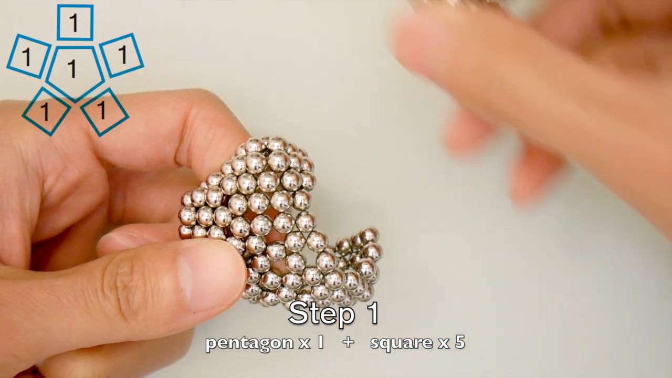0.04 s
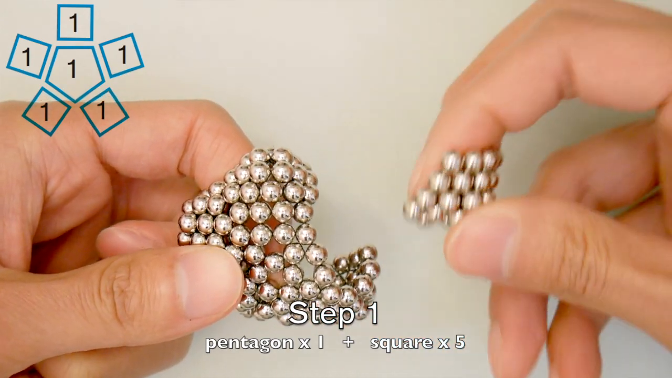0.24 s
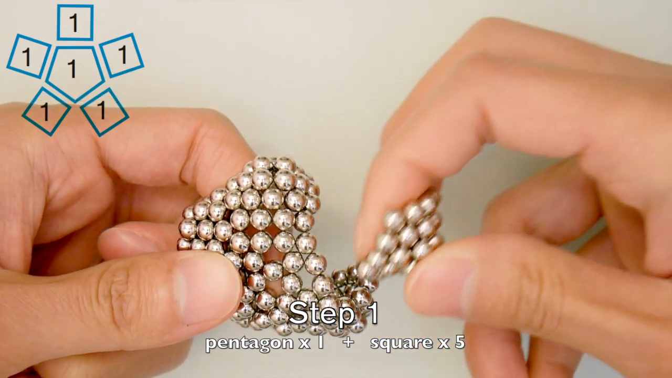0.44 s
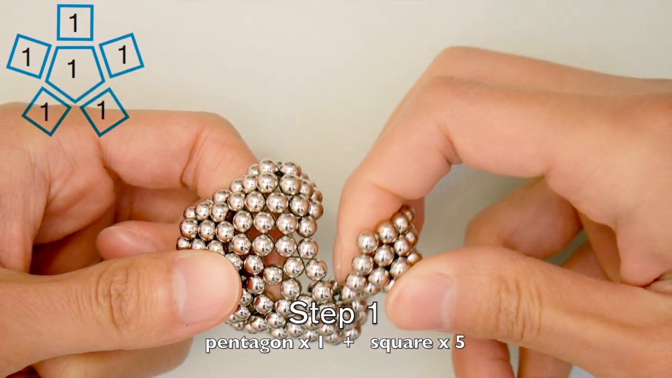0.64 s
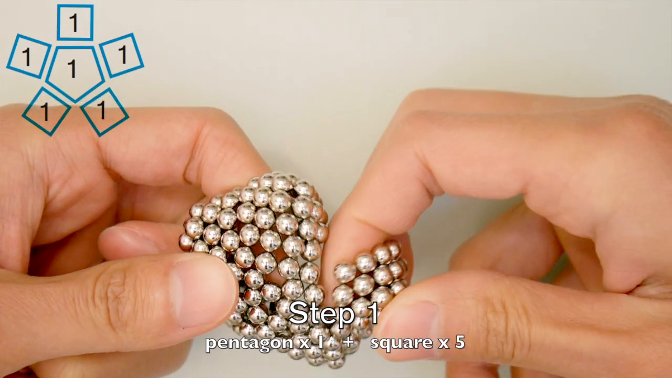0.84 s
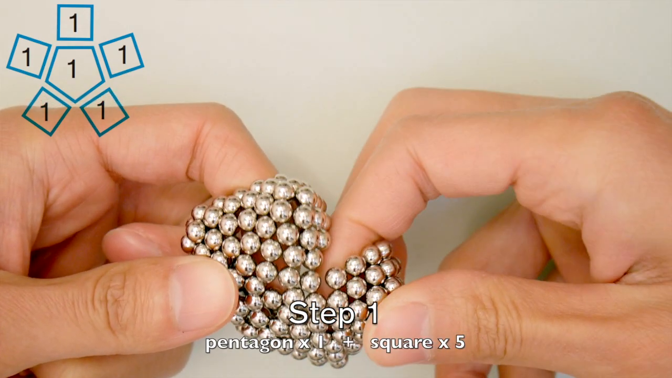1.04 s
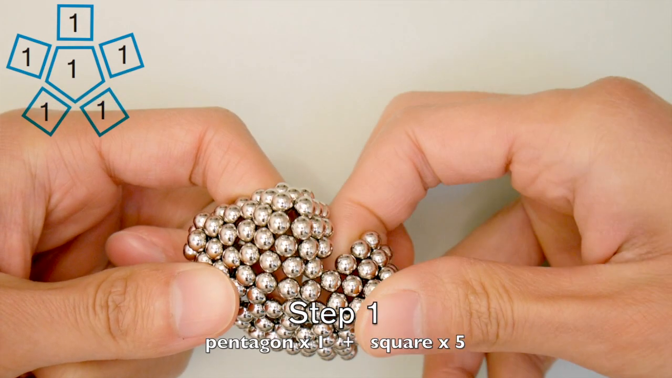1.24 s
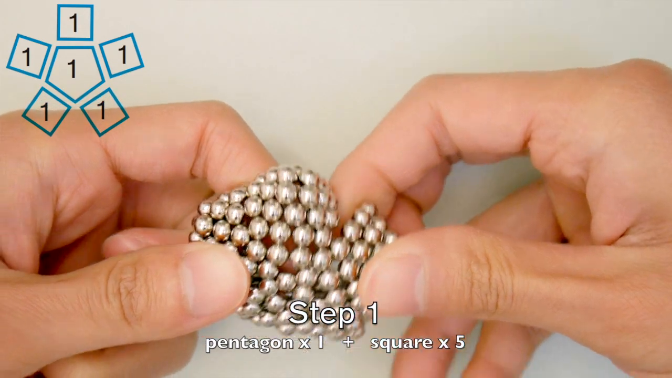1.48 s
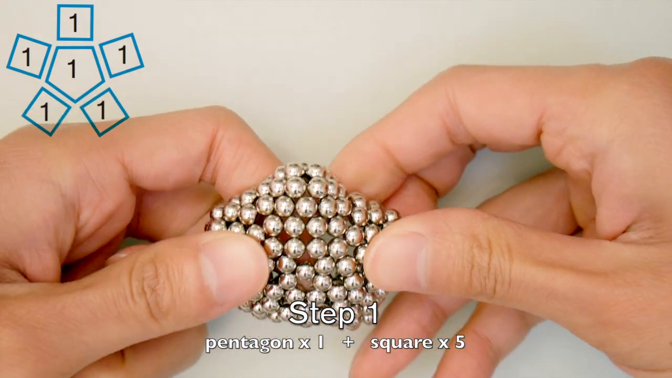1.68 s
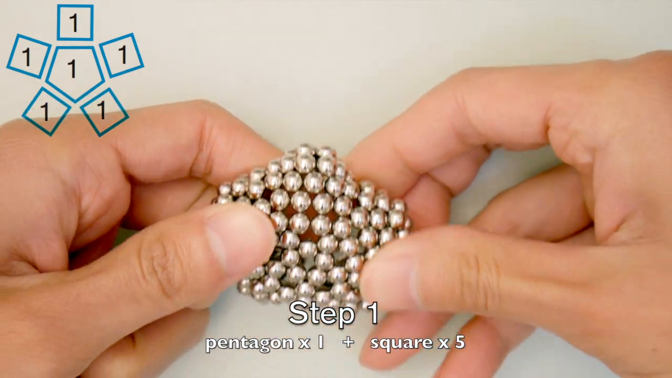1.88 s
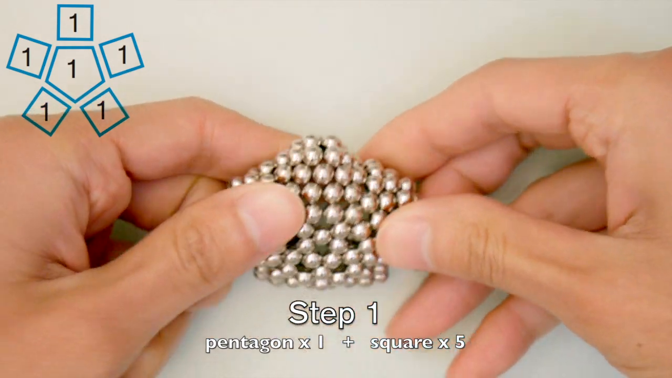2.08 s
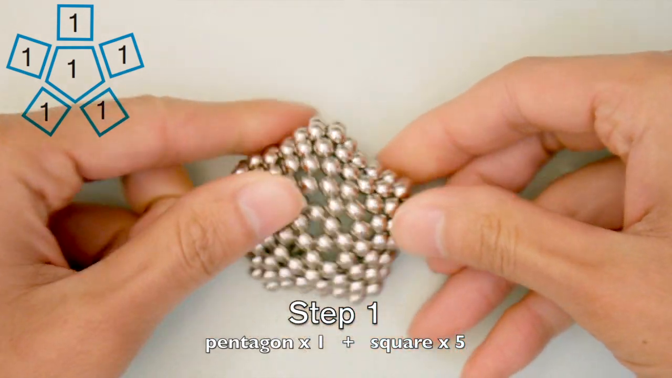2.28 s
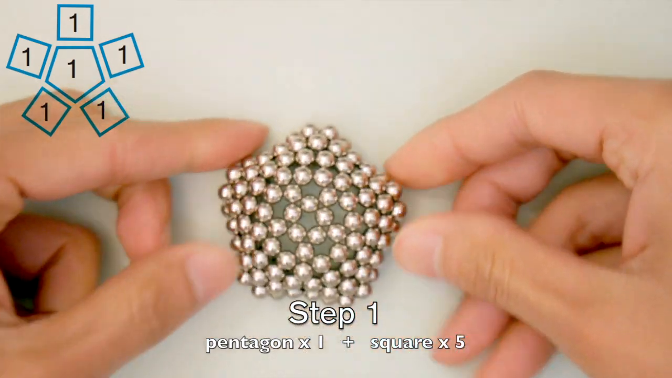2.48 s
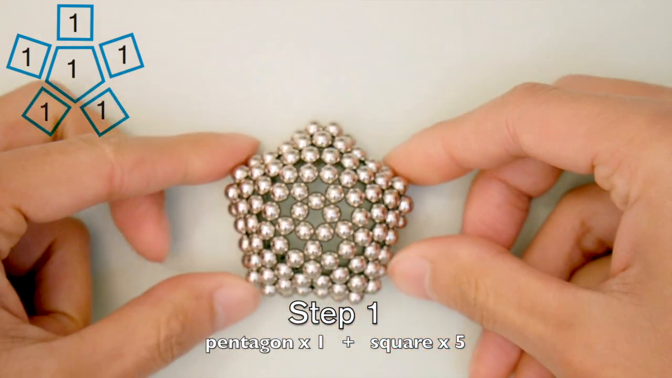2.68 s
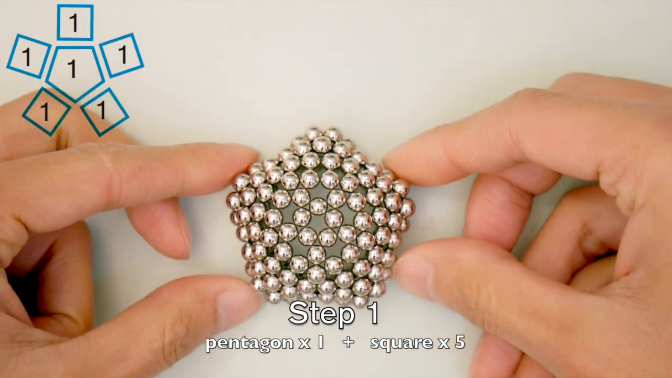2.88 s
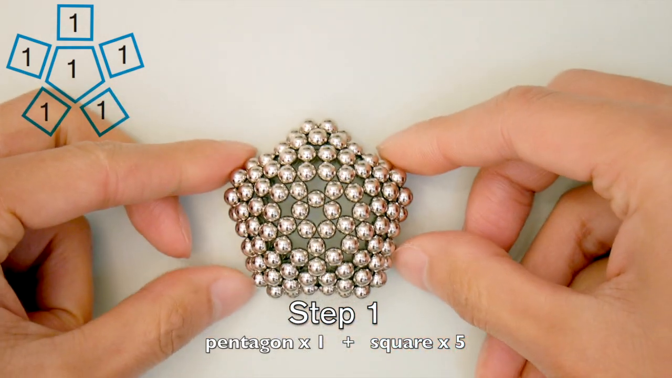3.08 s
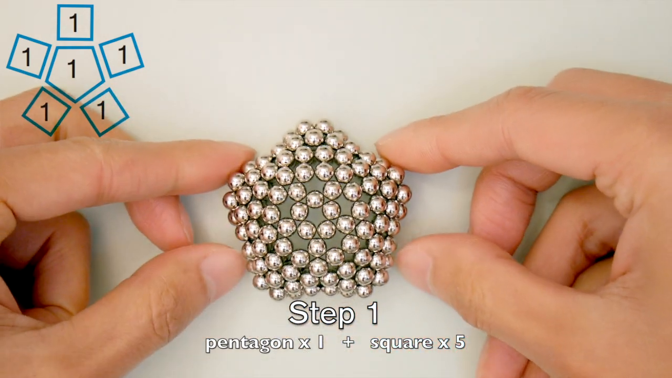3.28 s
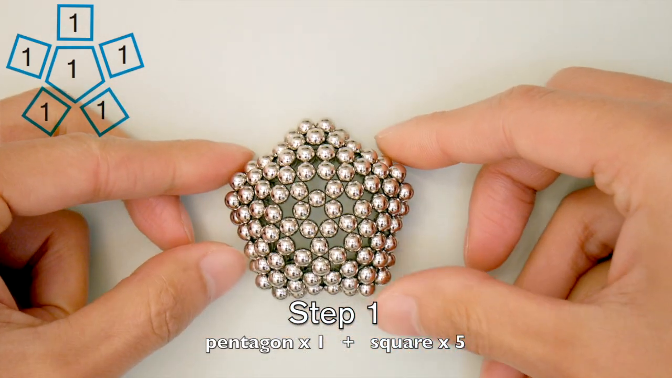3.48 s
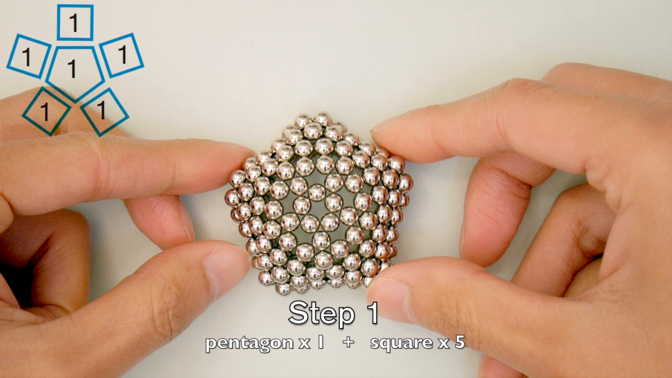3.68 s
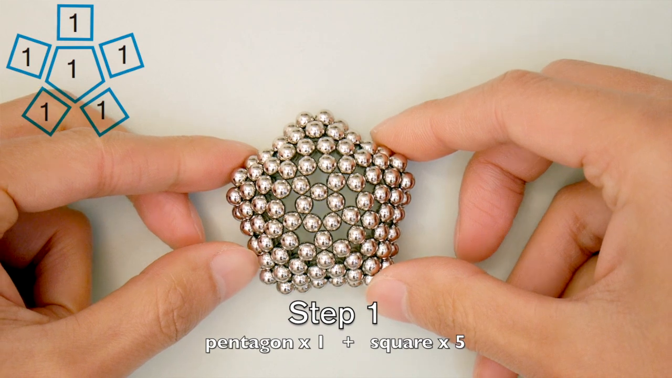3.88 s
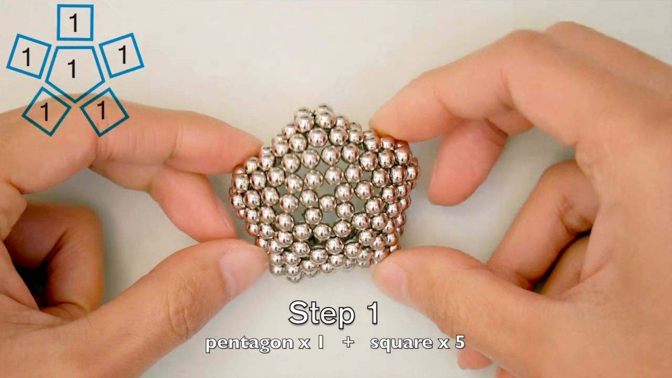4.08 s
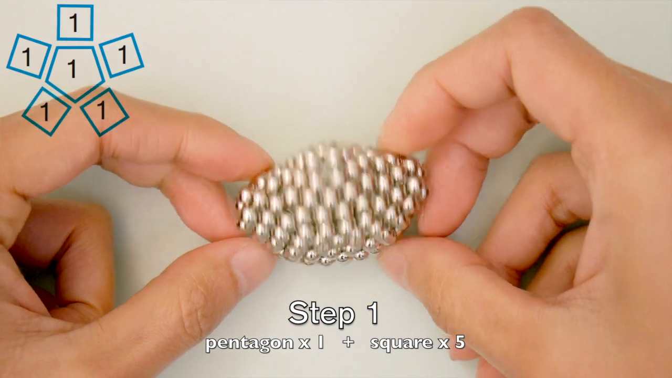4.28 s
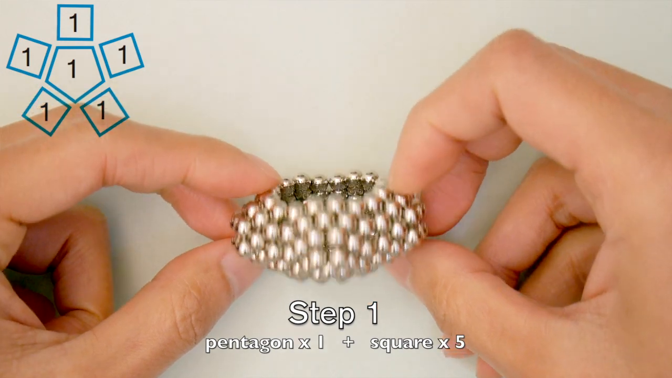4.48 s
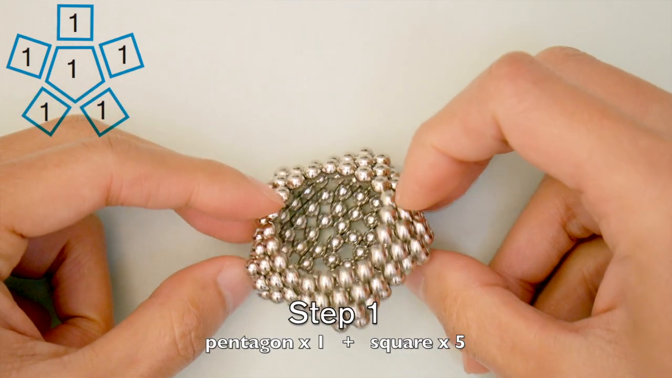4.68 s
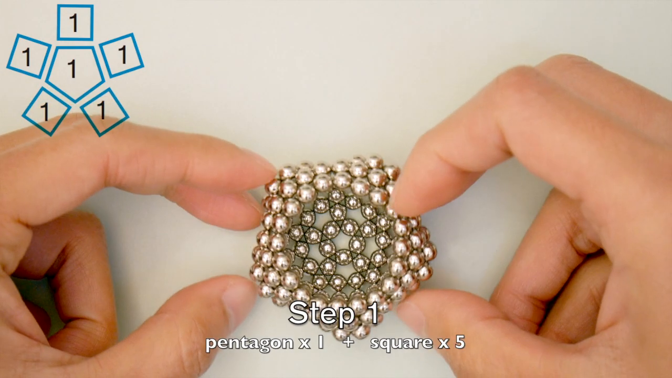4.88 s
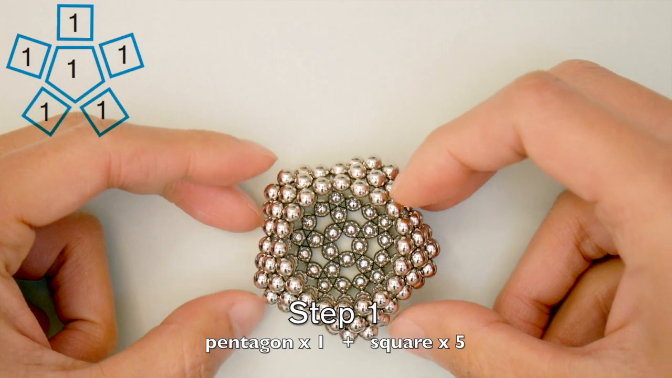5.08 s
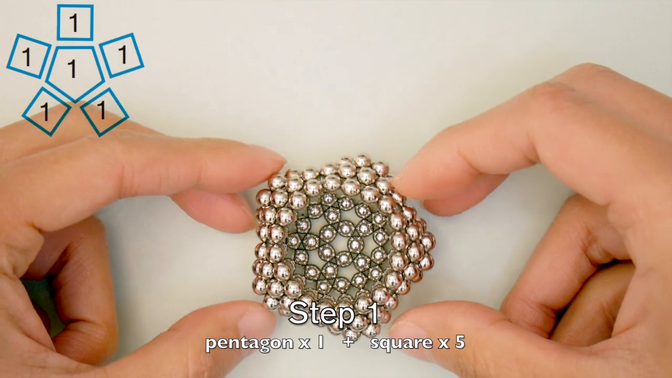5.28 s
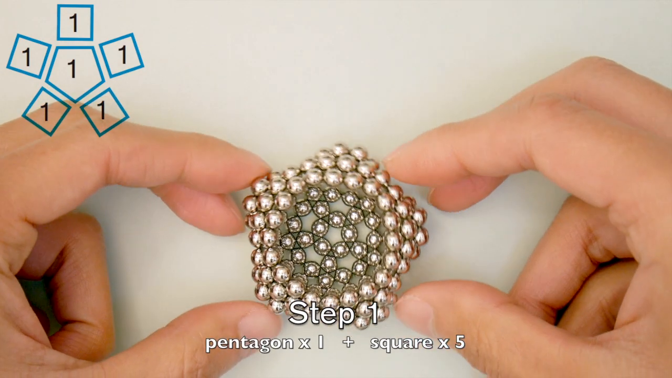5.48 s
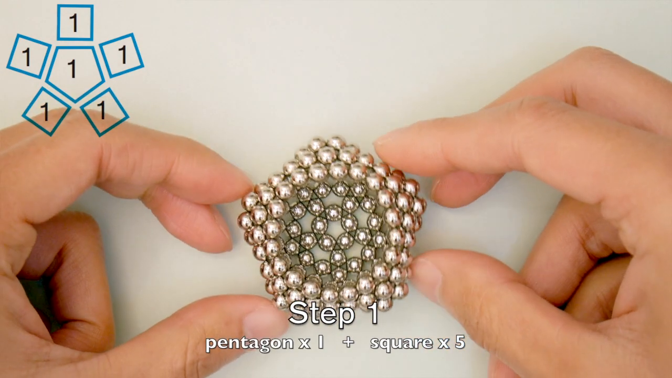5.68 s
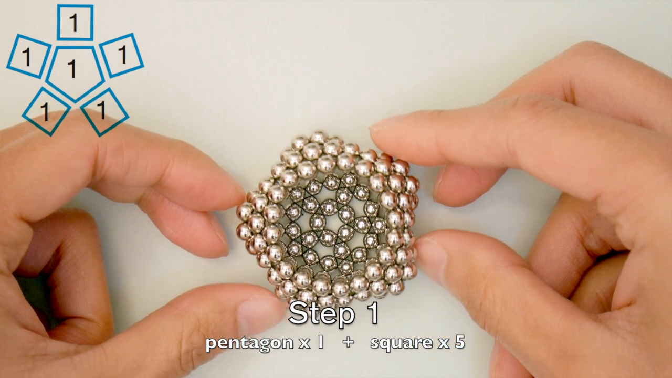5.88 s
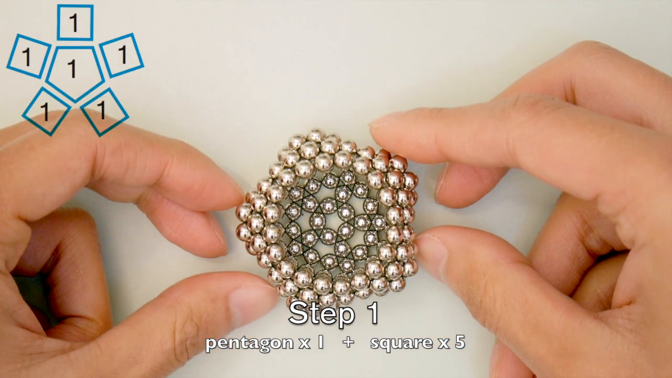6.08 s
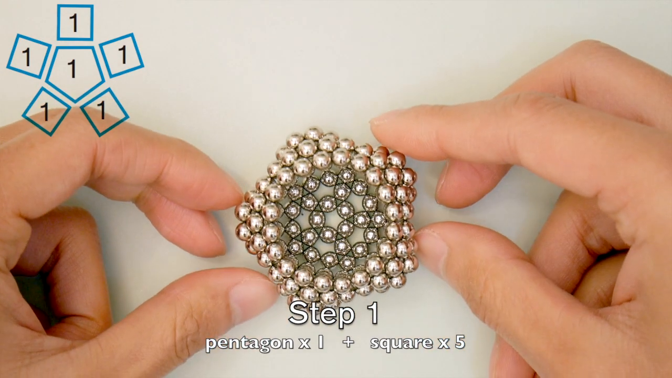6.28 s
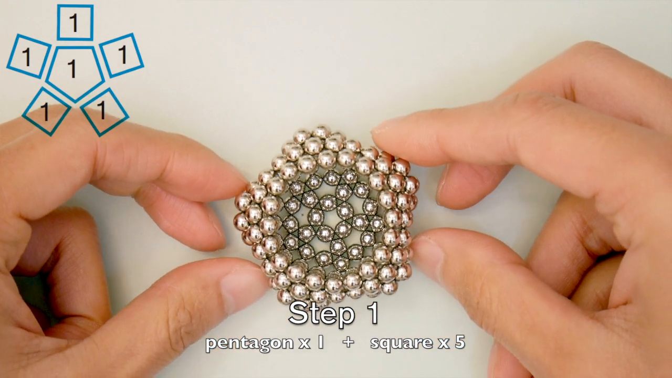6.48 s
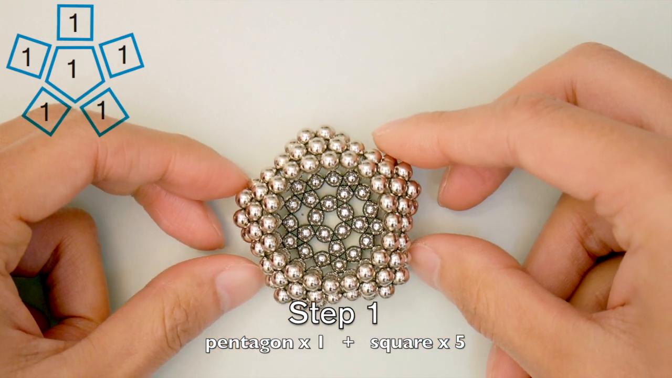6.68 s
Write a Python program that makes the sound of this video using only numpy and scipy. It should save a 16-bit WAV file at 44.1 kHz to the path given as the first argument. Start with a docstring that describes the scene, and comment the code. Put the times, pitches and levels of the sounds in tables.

```python
"""Over the steady noise of a small, quiet room, a hand brushes past. Small magnetic balls snap
together with bright clicks as hands join them into a shell, which ticks faintly as fingers bend it.
After two seconds the hollow shell pops into shape, knocks on the table and rolls a little; the
tabletop rings. After four seconds it is tipped over and rolls on its rim, knocking and rattling.
One last faint bend ends the scene."""
import sys
import numpy as np
from scipy import signal
from scipy.fft import rfft, irfft
from scipy.io import wavfile

SR = 44100
rng = np.random.default_rng(int(sys.argv[2]) if len(sys.argv) > 2 else 0)


def to_wav(sig):
    """Store sig (one row per channel, or 1-D mono) as 16-bit WAV at the path in sys.argv[1].

    Samples outside -1..1 are clipped; the rate is SR.
    """
    pcm = np.clip(np.atleast_2d(sig), -1, 1) * 32767
    pcm = np.round(pcm).astype(np.int16)
    wavfile.write(sys.argv[1], SR, pcm.T)  # frames by channels


N = 297448
FREQS_HZ = np.fft.rfftfreq(N, 1 / SR)


def amp(db):
    """Turns decibels into a number to multiply a sound by."""
    return 10 ** (np.asarray(db) / 20)


def unit_level(x):
    """Scales a sound so that its average (rms) level is 1."""
    return x / np.sqrt(np.mean(x ** 2) + 1e-20)


def look_up(table, hz):
    """Reads a table's value at any pitch, sliding between its rows."""
    pitches, values = np.transpose(table)
    return np.interp(np.log(hz + 1), np.log(pitches + 1), values)


def add(mix, start_s, sound):
    """Lays a sound into the mix at start_s."""
    part = mix[max(round(start_s * SR), 0):][:len(sound)]
    part += sound[:len(part)]


def with_tone(x, tone):
    """Makes each pitch as strong as a tone table says, then sets the average level to 1."""
    return unit_level(irfft(rfft(x) * amp(look_up(tone, FREQS_HZ)), N))


def pulse(tone_db, size=4096):
    """The shortest sudden tap that has the given tone, with a peak of 1."""
    log_gain = np.log(amp(np.maximum(tone_db(abs(np.fft.fftfreq(size, 1 / SR))), -100)))
    wave = np.fft.ifft(np.exp(np.conj(signal.hilbert(log_gain)))).real[:size // 2]
    return wave / abs(wave).max()


def grains(per_s, spread_db):
    """A random stream of tiny impacts of uneven size."""
    sizes = amp(spread_db * np.minimum(rng.exponential(1, N), 3)) * rng.choice([-1, 1], N)
    return unit_level(sizes * (rng.random(N) < per_s / SR))


def movements(rows):
    """Strength over time of movements that each gather speed, peak and die away."""
    power = np.zeros(N)
    for peak_s, rise_s, settle_s, level_db in rows:
        t = np.arange(N) / SR - peak_s
        fade = np.where(t < 0, (t / rise_s) ** 2, t / settle_s)
        power += (amp(level_db) * np.exp(-np.minimum(fade, 30))) ** 2
    return np.sqrt(power)


def pan(sound, balance):
    """Leans each pitch a little to the left or right."""
    left_gain = amp(look_up(balance, FREQS_HZ) / 2)
    return irfft(rfft(sound) * np.array([left_gain, 1 / left_gain]), N)


# How alike left and right are for sound from all around: pitch_hz, likeness (0 to 1)
LIKENESS = [(40, 0.35), (90, 0.29), (150, 1), (400, 0.51), (1500, 0.94), (4000, 0.89), (9000, 0.18),
            (14000, 0.64)]
def surrounding_noise(size):
    """Noise from all around, heard at two microphone openings close together."""
    left, unrelated = rfft(rng.standard_normal((2, size)))
    likeness = np.clip(look_up(LIKENESS, np.fft.rfftfreq(size, 1 / SR)), 0, 1)
    right = likeness * left + np.sqrt(1 - likeness ** 2) * unrelated
    return irfft(np.array([left, right]), size)


def waver():
    """A slow, random wobble around zero."""
    t = np.arange(N) / SR
    waves = sum(np.sin(2 * np.pi * (hz * t + rng.random())) for hz in np.geomspace(0.8, 8, 20))
    return 0.3 * unit_level(waves)


# Tone of the low room noise: pitch_hz, level_db
AIR_TONE = [(15, -53), (25, -11.5), (38, -34), (53, -6.5), (70, -23), (87, -8.5), (149, -5), (168, -10),
            (192, -0.5), (248, -9.5), (284, -4), (395, -12), (571, -12), (984, -15), (2600, -51.5),
            (3380, -62.5), (5720, -120)]
# Tone of the microphone hiss: pitch_hz, level_db
HISS_TONE = [(1530, -103), (2600, -16), (2890, -10), (3420, -14.5), (4130, -9.5), (4920, -4.5), (6570, 3.5),
             (9610, 5.5), (14400, -7), (16000, -28)]
# Notes in the hum: pitch_hz, level_db
HUM_NOTES = [(49.5, -82.5), (99.8, -69), (121, -74), (298, -72.5)]
# Which side the background leans to: pitch_hz, left_minus_right_db
BACKGROUND_BALANCE = [(60, 8.5), (130, 4), (300, 0.5), (1000, 1.9), (4000, -1), (8000, 0), (13000, -0.5)]
def background(air_db=-59, hiss_db=-75):
    """Low room noise, a faint wavering hum and microphone hiss go on throughout."""
    hum, t = np.zeros(N), np.arange(N) / SR
    for pitch_hz, level_db in HUM_NOTES:
        strength = amp(level_db) * np.sqrt(2) * (1 + waver())
        hum += strength * np.sin(2 * np.pi * pitch_hz * t + 2 * waver())
    air = amp(air_db) * with_tone(surrounding_noise(N), AIR_TONE)
    hiss = amp(hiss_db) * with_tone(surrounding_noise(N), HISS_TONE)
    return pan(air + hiss + hum, BACKGROUND_BALANCE)


# Strokes of the hand: peak_s, rise_s, settle_s, level_db
HAND_STROKES = [(0.09, 0.096, 0.18, -56), (0.215, 0.065, 0.052, -51), (0.44, .04, 0.12, -61.5)]
# Tone of sliding skin: pitch_hz, level_db
SKIN_TONE = [(60, -25), (280, 15.5), (600, -1), (1200, 0), (2000, -29), (3000, -34), (4500, -23.5),
             (6500, -13.5), (10000, -11), (12500, -14), (15500, -53)]
def hand_brush(gain_db=-3):
    """Sliding skin catches and slips thousands of times a second."""
    slips = with_tone(grains(per_s=4000, spread_db=1.5), SKIN_TONE)
    return amp(gain_db) * movements(HAND_STROKES) * slips


# Ball meets ball: start_s, level_db, pitch_hz, grip (0 loose to 1 held tightly by the shell)
BALL_SNAPS = [(0.0131, -38, 8100, 0.33), (0.5982, -18.5, 10100, 0.08), (0.8087, -36, 8800, 0),
              (0.979, -37, 9600, .05), (0.9816, -24.5, 9160, 0), (1.2724, -54, 9500, 0.2),
              (1.308, -38.5, 8100, 0.04), (2.1482, -36.5, 9200, 0.5), (2.154, -30.5, 9050, .75),
              (2.2054, -36.5, 10400, 1), (2.265, -47.5, 7500, 0.1), (2.309, -46.5, 7800, 1),
              (2.421, -23.5, 9800, 0.96), (2.4483, -33.5, 10000, 0.6), (2.812, -54, 9500, .1),
              (4.0943, -35.5, 7500, 1), (4.4927, -52, 7500, .9), (4.6272, -49.5, 7150, 0),
              (4.687, -51, 8000, .75), (4.947, -47.5, 8450, 0.8), (4.9737, -36, 9300, 0.8)]
# Tone that all the clicks share: pitch_hz, level_db
CLICK_TONE = [(300, -28), (1500, -1), (2800, -11.5), (4000, -2.5), (6000, -1), (7500, -4), (10000, 3),
              (12000, 1), (13200, -1), (14500, -17), (16000, -5)]
def ball_snaps(gain_db=2, smear_s=0.00129, smear_centre_hz=9500):
    """The balls are too small to ring audibly, so each hit gives one very short, bright click."""
    loose_width_hz, held_width_hz = 3700, 12000  # a tightly held ball gives a wider range of pitches
    loose_low_hz, held_low_hz = 5640, 1680  # and its click reaches lower
    clicks = np.zeros(N)
    for start_s, level_db, pitch_hz, grip in BALL_SNAPS:
        width_hz = loose_width_hz * (held_width_hz / loose_width_hz) ** grip
        low_hz = loose_low_hz * (held_low_hz / loose_low_hz) ** grip
        hump_db = lambda hz: -20 * np.log10(1 + 2 * ((hz - pitch_hz) / width_hz) ** 2)
        low_cut_db = lambda hz: -10 * np.log10(1 + (low_hz / (hz + 1)) ** 10)
        click = pulse(lambda hz: look_up(CLICK_TONE, hz) + hump_db(hz) + low_cut_db(hz))
        add(clicks, start_s, amp(level_db) * click)
    # the shock spreads out in time as it runs through the joined balls
    smear = np.exp(-1j * np.pi * smear_s * (FREQS_HZ - smear_centre_hz) ** 2 / smear_centre_hz)
    return amp(gain_db) * irfft(rfft(clicks) * smear, N)


# The shell hits the table: start_s, level_db, dull_above_hz, push_db (compared with the knock)
SHELL_KNOCKS = [(0.1907, -42.5, 1400, -18), (0.8327, -47.5, 2030, -8), (2.149, -24.5, 1490, -19),
                (2.1552, -24, 1250, -6), (2.1990, -42, 497, -23), (2.4229, -8, 894, -20.5),
                (4.0928, -30, 1027, -15.5), (4.3830, -42, 694, -22), (4.397, -39, 500, -24),
                (4.4180, -36, 398, -17), (4.4420, -46, 600, -10), (4.4915, -43, 750, -18),
                (4.6490, -37, 420, -14), (4.696, -39.5, 400, -28), (4.7890, -47, 885, -11),
                (4.9580, -35.5, 497, -11), (4.9732, -37.5, 500, -4)]
# Tone of a knock: pitch_hz, level_db
KNOCK_TONE = [(30, -65.5), (60, -35), (90, -12.5), (130, -7.5), (250, -4.5), (460, 5), (650, -0.5),
              (1000, -7.5), (1400, -13), (1900, -20.5), (2600, -40), (6000, -56), (16000, -84)]
def shell_knocks(push_hz=122, push_fade_s=0.087, push_rise_s=0.0033):
    """The shell hits the table, duller when the contact is soft; the hands add a low push."""
    thuds, t = np.zeros(N), np.arange(SR // 4) / SR
    push = np.sin(2 * np.pi * push_hz * t) * amp(-60 * t / push_fade_s)
    push *= 1 - np.exp(-(t / push_rise_s) ** 2)
    push = signal.sosfilt(signal.butter(3, 75, "highpass", fs=SR, output="sos"), push)
    for start_s, level_db, dull_above_hz, push_db in SHELL_KNOCKS:
        knock = pulse(lambda hz: look_up(KNOCK_TONE, hz) - 10 * np.log10(1 + (hz / dull_above_hz) ** 4))
        add(thuds, start_s, amp(level_db) * knock)
        add(thuds, start_s, amp(level_db + push_db) * push)
    return thuds


# Tone of many balls ticking together: pitch_hz, level_db
TICKING_TONE = [(300, -38), (1500, -7), (2700, -43), (3800, -6), (6500, 1.5), (10000, 6.5), (12000, 6.5),
                (15500, -49)]
def shell_clatter(gain_db=-22, fade_s=0.02, fully_hard_hz=1100):
    """Each knock jolts the shell: many balls tick at once, louder when the contact is hard."""
    jolts, t = np.zeros(N), np.arange(SR // 4) / SR
    for start_s, level_db, dull_above_hz, _ in SHELL_KNOCKS:
        hardness = min(dull_above_hz / fully_hard_hz, 1) ** 2
        add(jolts, start_s, hardness * amp(level_db + gain_db - 60 * t / fade_s))
    return jolts * with_tone(grains(per_s=6800, spread_db=8), TICKING_TONE)


# Low notes of the tabletop in the room: pitch_hz, level_db, fade_s (time to drop by 60 dB)
TABLETOP_NOTES = [(134.8, -14.5, .34), (204.8, -20, 0.81), (280, -21, 0.47), (327, -19, 0.44),
                  (340, -24.5, 0.47), (399.4, -23.5, 0.24), (417.6, -29.5, 0.12), (477.6, -17, 0.22),
                  (546, -21, 0.3), (577, -27.5, 0.41), (619, -24, 0.34), (668, -22.5, 0.26),
                  (764, -22.5, 0.16), (875, -19, 0.15), (967, -14.5, 0.21), (955, -23, 0.095),
                  (1153, -29, .22), (1097, -19.5, 0.33), (1358, -14, 0.19)]
def tabletop_ring(thuds, build_s=0.01):
    """The tabletop's notes build up after each thud and ring on; neighbours swing opposite ways."""
    ring, t = np.zeros(SR), np.arange(SR) / SR
    for k, (pitch_hz, level_db, fade_s) in enumerate(TABLETOP_NOTES):
        ring += (-1) ** k * amp(level_db - 60 * t / fade_s) * np.cos(2 * np.pi * pitch_hz * t)
    ring *= 1 - np.exp(-t / build_s)
    step_ms = 1000 / SR
    return step_ms * signal.fftconvolve(thuds, ring)[:N]


# Fingers bend the shell: peak_s, half_length_s, level_db
SHELL_BENDS = [(1.646, 0.11, -75), (2.254, 0.31, -74.5), (2.616, 0.096, -72), (2.9, 0.18, -87),
               (5.68, 0.099, -80)]
def shell_rattle(gain_db=-3, roll_share_db=-23):
    """Rows of balls tick against each other whenever the shell bends or rolls."""
    bending = movements([(peak_s, half_s, half_s, db) for peak_s, half_s, db in SHELL_BENDS])
    rolling = amp(roll_share_db) * movements(SHELL_ROLLS)
    ticks = with_tone(grains(per_s=540, spread_db=7.5), TICKING_TONE)
    return amp(gain_db) * np.hypot(bending, rolling) * ticks


# The shell pops into shape: start_s, level_db
SHELL_POPS = [(2.148, -35), (2.1552, -29.5)]
def shell_pops(pitch_hz=848, fade_s=0.05):
    """The hollow shell rings briefly as it pops into shape."""
    pops, t = np.zeros(N), np.arange(SR // 4) / SR
    ring = np.sin(2 * np.pi * pitch_hz * t) * amp(-60 * t / fade_s)
    for start_s, level_db in SHELL_POPS:
        add(pops, start_s, amp(level_db) * ring)
    return pops


# The shell rolls on the table: peak_s, rise_s, settle_s, level_db
SHELL_ROLLS = [(2.34, 0.082, 0.26, -48), (2.8, 0.089, 0.42, -58), (4.14, 0.028, 0.22, -54.5),
               (4.425, 0.043, 0.04, -47.5), (4.66, 0.05, 0.054, -52), (4.815, 0.033, .1, -56),
               (4.97, 0.051, 0.057, -47.5)]
# Tone of one ball rolling on the table: pitch_hz, level_db
ROLL_TONE = [(40, -51), (80, -19), (130, -3), (205, -0.5), (300, 3), (430, -5), (600, -7), (1000, -18),
             (1400, -21.5), (2000, -46), (3000, -51.5), (8000, -74.5)]
def shell_roll(gain_db=-2):
    """Ball after ball touches the table, and the small bumps blur into a rumble."""
    bump = pulse(lambda hz: look_up(ROLL_TONE, hz))
    bumps = signal.fftconvolve(grains(per_s=400, spread_db=2), bump)[:N]
    return amp(gain_db) * movements(SHELL_ROLLS) * unit_level(bumps)


# Echoes from nearby surfaces: delay_s, level_db, dull_above_hz
NEAR_ECHOES = [(.0023, -14, 14100), (.0047, -47, 8900), (.0070, -11, 2500), (0.0171, -15.5, 2000),
               (0.0354, -13, 1500)]
# How long the room's tail takes to drop by 60 dB: pitch_hz, fade_s
TAIL_FADE = [(120, 0.28), (350, 0.44), (900, 0.34), (2500, 0.19), (6000, 0.24), (10000, 0.19),
             (15000, 0.21)]
# Strength of that tail compared with the direct sound: pitch_hz, level_db
TAIL_TONE = [(100, -6), (240, -12), (400, -5), (700, -7), (1200, 3), (4000, -2.5), (10000, 4),
             (15000, -4.5)]
def room(sound, tail_rise_s=0.0004):
    """Sound bounces off a few close surfaces, then blurs into a short tail of echoes."""
    near = sound.copy()
    for delay_s, level_db, dull_above_hz in NEAR_ECHOES:
        smoothing = np.exp(-2 * np.pi * dull_above_hz / SR)
        add(near, delay_s, amp(level_db) * signal.lfilter([1 - smoothing], [1, -smoothing], sound))
    hz, t, noise = signal.stft(surrounding_noise(SR), SR, nperseg=256)
    fade_s = look_up(TAIL_FADE, hz)[:, None]
    equal_energy = np.sqrt(2 * np.log(1000) / (fade_s * SR))  # a longer fade adds no energy
    fading = amp(look_up(TAIL_TONE, hz)[:, None] - 60 * t / fade_s)
    tail = signal.istft(noise * equal_energy * fading, SR, nperseg=256)[1]
    tail *= 1 - np.exp(-(np.arange(tail.shape[1]) / SR / tail_rise_s) ** 2)
    return near + signal.fftconvolve(sound[None], tail, axes=1)[:, :N]


# Which side the close sounds lean to: pitch_hz, left_minus_right_db
CLOSE_BALANCE = [(100, 1), (500, -0.6), (1000, -0.5), (5000, 1), (9000, 3), (12500, -1.5)]
def scene():
    """Hands, balls and shell sound in the room; knocks, pops and rolls also set the table ringing."""
    thuds = shell_knocks() + shell_pops() + shell_roll()
    clicks = ball_snaps() + shell_rattle() + shell_clatter()
    close_sounds = room(hand_brush() + clicks + thuds) + tabletop_ring(thuds)
    return pan(close_sounds, CLOSE_BALANCE) + background()


def record(dry, lag_s=7e-6, top_hz=15500):
    """Sound reaches the right side a moment before the left, and the highest treble is cut off."""
    half_delay = np.exp(-1j * np.pi * FREQS_HZ * lag_s)
    stereo = irfft(rfft(dry) * np.array([half_delay, 1 / half_delay]), N)
    treble_cut = signal.firwin(255, top_hz, window=("kaiser", 8), fs=SR)
    return signal.oaconvolve(stereo, treble_cut[None], "same")


dry = scene()
out = record(dry)
to_wav(out)
```